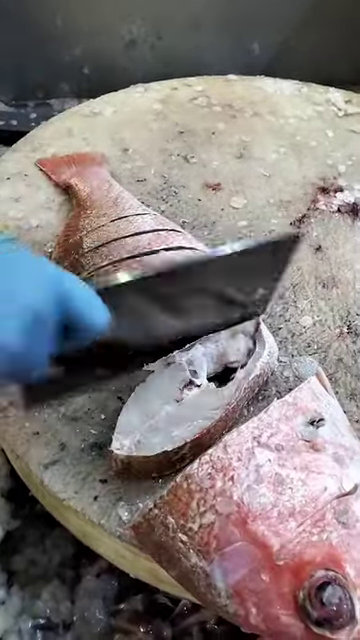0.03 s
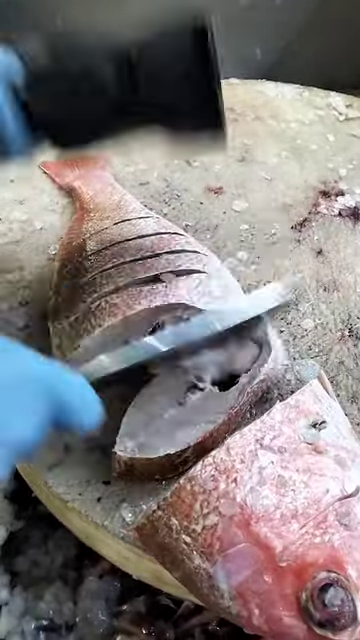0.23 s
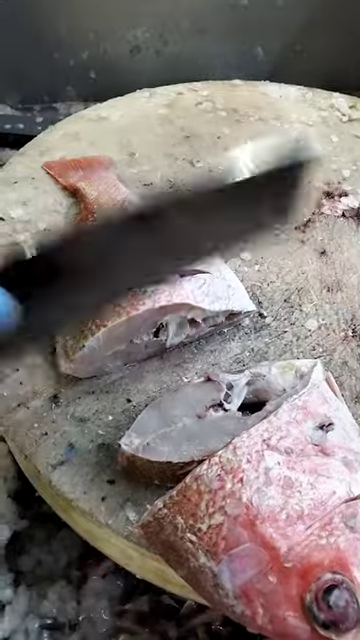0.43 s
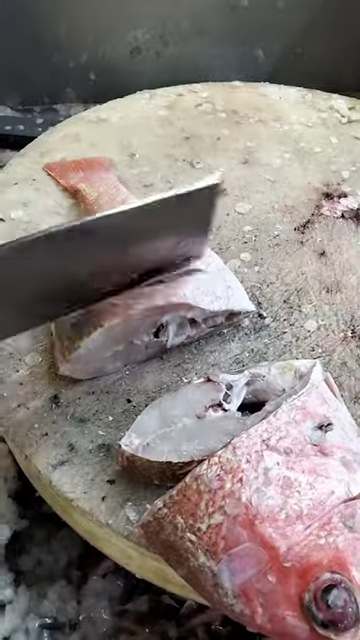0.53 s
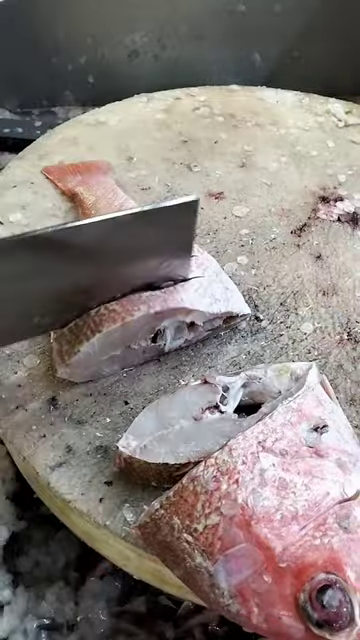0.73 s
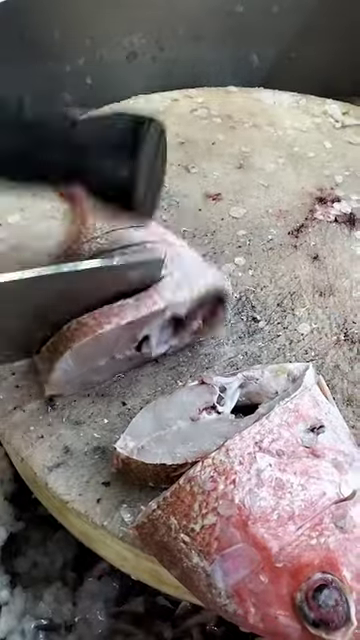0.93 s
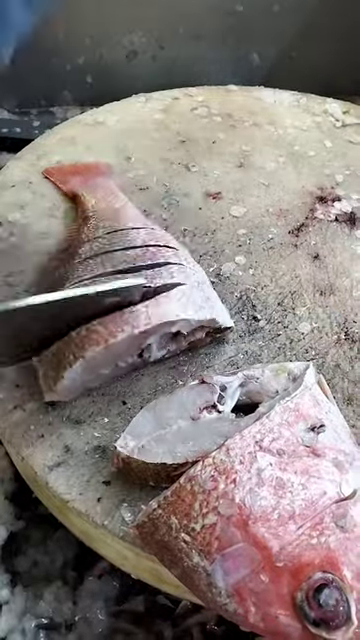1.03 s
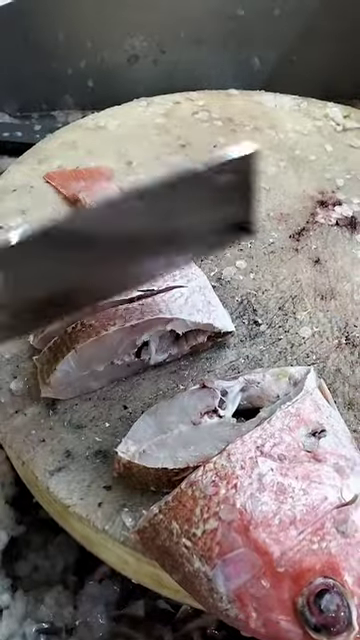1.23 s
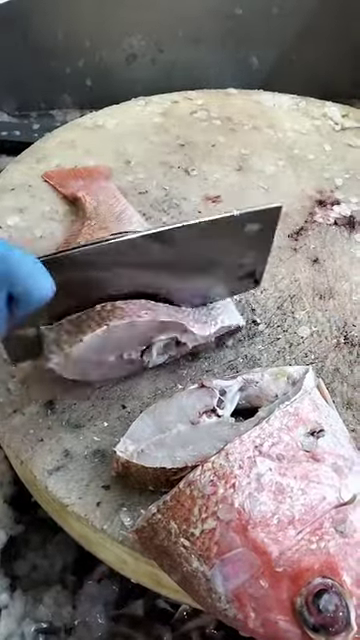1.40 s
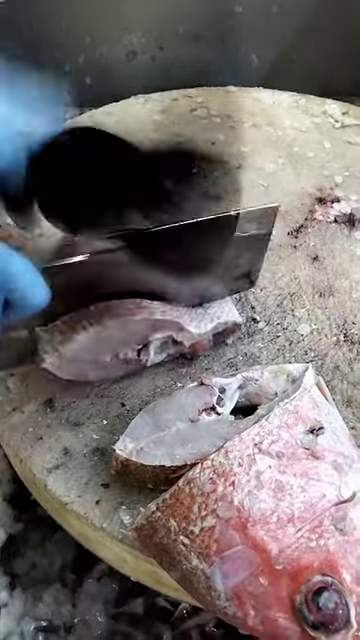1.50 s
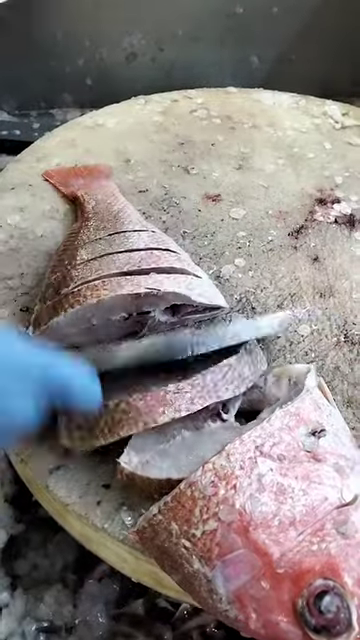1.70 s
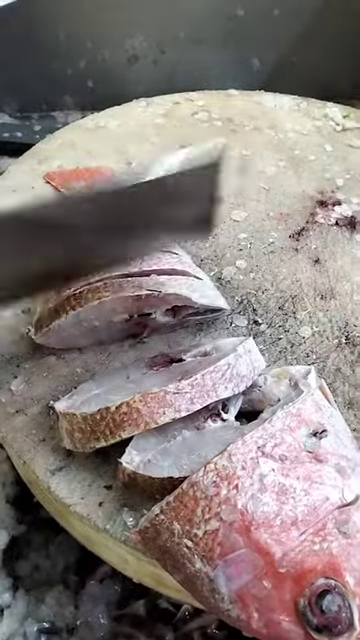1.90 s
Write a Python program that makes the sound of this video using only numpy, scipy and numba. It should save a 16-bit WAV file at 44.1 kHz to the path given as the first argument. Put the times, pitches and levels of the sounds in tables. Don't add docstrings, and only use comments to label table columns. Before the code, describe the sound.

Cleaver blows crack through fish onto a wooden chopping block, with faint wet ticks between them

```python
import sys
import numpy as np
from scipy import signal
from scipy.io import wavfile
from scipy.ndimage import uniform_filter1d, minimum_filter1d
from numba import njit

SR = 44100
rng = np.random.default_rng(int(sys.argv[2]) if len(sys.argv) > 2 else 0)


def generate_wav(sig):
    pcm = np.round(np.clip(np.atleast_2d(sig).T, -1, 1) * 32767).astype(np.int16)
    wavfile.write(sys.argv[1], SR, pcm)


def boost_factor(decibels):
    exponent = np.asarray(decibels, float) / 20
    return 10 ** exponent


N = 85995

# [t/s, level/dB, crack length/s, lead-in through flesh/s, damping on landing/dB]
BLOWS = [
    (-.17, -2.5, .004, .003, -0.5),
    (0.2082, 4.5, 0.0061, 0.0038, -2.5),
    (0.9088, 4, 0.0039, 0.0026, -5.5),
    (1.5349, 3.5, 0.0012, 0.0054, -7),
]
KIND = [2, 0, 1, 2]

# [f/Hz, time to fall 60 dB/s, rise/s, dull level/dB, sharp level/dB, ringing level/dB]
STAND_MODES = [(44.4, 0.18, 0.0051, -40, -31, -37), (72.63, 0.71, 0.037, -25, -16.5, -13),
               (80.9, 1, 0.11, -44, -23, -33), (92.07, 0.44, 0.01, -6, -17, -4),
               (130.9, 0.43, 0.013, -18, -10, -29), (136.7, .36, 0.0077, -4.5, -23.5, -10),
               (187.3, 0.14, 0.0032, -3, -14, -8), (222.3, 0.45, 0.013, -11.5, -13.5, -11.5),
               (313.3, 0.31, 0.053, -11, -6.5, -5.5), (395.5, 0.18, 0.0071, -31.5, -16, -10),
               (432.5, 0.32, 0.015, -22, -18, -23), (572.4, 0.37, 0.017, -22.5, -22, -14.5)]
# [f/Hz, time to fall 60 dB/s, rise/s, dull level/dB, sharp level/dB, ringing level/dB]
BLADE_MODES = [(643, 0.24, 0.0015, -22, -20, -32), (706.2, 0.12, 0.0051, -23, -5.5, -7),
               (705, 0.21, 0.0034, -40, -42, -11), (909, 0.061, 0.0018, -45, -17.5, -15),
               (988, 0.086, 0.002, -40, -24, -5), (1060, 0.59, 0.005, -42, -37, -26.5),
               (1143, 0.41, 0.0036, -32, -30, -22.5), (1243, 0.046, 0.0023, -24, -7.5, -23),
               (1482, 0.027, 0.0014, -21, -7.5, -5.5), (1695, 0.32, 0.00022, -48, -45, -24.5),
               (2300, 0.047, 0.00011, -27, -16.5, -26), (4150, 0.077, 0.0027, -34, -37, -45)]
# [f/Hz, s, s, dB, dB, dB]
CHEEK_MODES = [(627, 0.56, 0.0077, -45, -38, -28), (1037, 0.16, 0.0028, -44, -33, -16.5),
               (1048, 0.42, 0.0045, -33, -30, -16.5), (1105, 0.39, 0.0044, -36, -45, -21),
               (1130, 0.19, 0.0028, -52, -40, -13.5), (1225, 0.18, 0.0023, -27, -17, -20),
               (1306, 0.22, .002, -33, -29, -28), (1667, 0.29, 0.0028, -40, -31, -25),
               (1721, 0.31, 0.0035, -38, -30, -27), (1770, 0.21, 0.006, -49, -29, -25),
               (2006, 0.067, 0.00083, -32, -24, -34), (2440, 0.097, 0.0016, -45, -43, -20.5),
               (3200, 0.16, .001, -39, -43, -42), (4022, 0.17, 0.0032, -46, -42, -28)]
STAND_ROUGH, BLADE_ROUGH, CHEEK_ROUGH = 0.22, 0.25, 0.4
ROUGH_HZ, WAVER_GROWS_S = 25.19, 0.02
STAND_LAG_S = [0.0056, 0.001, 0.0053]
PRESS_DB = [-17, -22, -17]
PRESS_S = 0.0049
ROCKING_HZ = (120, 150)

SETTLE_S, SETTLE_EDGE_S = 0.086, 0.01
SETTLE_TOP_HZ, DEEP_SETTLE, HIGH_SETTLE = 900, 0.82, 0.25

# [f/Hz, time to fall 60 dB/s, rise/s, dull level/dB, sharp level/dB, ringing level/dB]
KNOCK_MODES = [(403.4, 0.073, 0.0034, -3, -24, -4.5), (683, 0.069, 0.0059, -7, -9, -6.5),
               (1029, 0.052, 0.0015, -6, -14, -6), (1680, 0.068, 0.00017, -23, -21.5, -24),
               (2913, 0.014, 0.00032, -17, -8, -10.5)]

SHOVE_DB = [-40, -2, -20]
SHOVE_S = 0.0026

# [f/Hz, level per Hz/dB]
CRACK_COLOURS = [
    [(180, -40), (300, 5.5), (1150, 2), (1510, -44), (4020, -9.5), (7080, -54), (14200, -33), (16000, -33)],
    [(180, -3), (300, -7), (1530, -20), (3580, -20), (4300, -6.5), (7440, -22), (11700, -16.5),
     (16000, -26)],
    [(180, -35), (300, -14), (1170, -12), (2140, -30.5), (3890, -13), (7570, -38.5), (12300, -31.5),
     (16000, -40)],
]
CRACK_DB = [-9, -4, -6]
LEAD_DB = [-18, -18, -11]
CRACK_RISE, CRACK_FALL = 0.35, 3.5

# [f/Hz, level per Hz/dB]
TAIL_COLOURS = [
    [(94, -55), (160, -2.5), (436, -11.5), (508, -24), (653, -12), (1920, -29.5), (11800, -53.5),
     (16000, -74)],
    [(94, -12.5), (160, 1), (270, -6), (480, -12), (719, -7), (1520, -17), (1680, -19.5), (16000, -49)],
    [(100, -22), (170, -4.5), (480, -16), (1080, -10.5), (1400, -18), (2150, -25.5), (4000, -31),
     (16000, -58)],
]
TAIL_DB = [-16.5, -10, -9.5]
# [f/Hz, time to fall 60 dB/s]
STALL_T60 = [(40, 0.84), (150, 0.55), (500, 0.52), (1500, 0.2), (4000, 0.21), (15000, 0.18)]
LATE_DB, LATE_T60_S = -24, 1.0

# [t/s, length/s, level/dB, tilt/dB per octave]
DRAGS = [(0.214, 0.022, -49, 4.5), (0.246, 0.037, -41.5, -1), (0.289, 0.031, -39.5, -2.5),
         (0.324, 0.024, -43.5, -2.5), (0.346, 0.052, -51.5, -8.5), (0.413, 0.073, -55.5, -8.5),
         (0.63, 0.034, -64.5, 5), (.665, 0.022, -62, 3), (0.685, 0.055, -54, 4), (0.749, 0.044, -53, 2),
         (0.787, .005, -58, 2), (0.792, 0.015, -57, 2), (0.814, 0.056, -53, -0.5), (1.17, 0.37, -62.5, 2.5),
         (1.222, .22, -59.5, -9.5), (1.351, 0.023, -55, -8.5), (1.012, 0.061, -50.5, -6)]
# [f/Hz, level per Hz/dB]
DRAG_COLOUR = [(180, -37), (350, -7.5), (1500, 0), (2000, -2.5), (4300, -1.5), (6600, -10.5),
               (14600, -15.5), (16000, -22)]
DRAG_EDGE_S, DRAG_FLICKER_DB = 0.022, 1.05
# [t/s, length/s, f/Hz, width/Hz, level/dB]
SQUEALS = [(0.7, 0.071, 4420, 350, -57), (.685, 0.017, 7500, 500, -55), (.695, .02, 8400, 500, -65),
           (0.29, .03, 13000, 460, -59), (0.3, .03, 13800, 500, -63), (0.28, .03, 6400, 500, -56)]

# [t/s, peak level/dB, centre f/Hz]
TICKS = [(.1451, -47, 4060), (.367, -45, 6000), (.474, -44, 3930), (.5155, -40, 3900), (.5608, -48, 5030),
         (.7876, -38, 3700), (.7878, -43, 11800), (.7878, -44, 15000), (.804, -49, 5500),
         (.8268, -33, 3050), (.8272, -42, 6000), (.8295, -45, 13500), (.834, -42, 3020), (.8375, -43, 2000),
         (.864, -48, 6000), (1.274, -43, 5070), (1.304, -48.5, 8960), (1.356, -47, 6000),
         (1.4735, -49, 9000)]
TICK_S, TICK_AIR_DB = 0.002, -14

# [t/s, length/s, f/Hz, level/dB]
WHINES = [(0.033, 0.19, 796, -51), (0.386, 0.11, 862, -52.5), (0.626, 0.23, 393, -53.5),
          (0.722, 0.12, 1179, -61), (1.205, 0.86, 1572, -61), (1.317, 0.2, 770, -56),
          (1.832, .2, 393, -48.5)]
# [f/Hz, level per Hz/dB]
FLOOR_COLOUR = [(45, -15), (72, 4.5), (400, -16), (1650, -25.5), (2000, -30.5), (4300, -31.5), (6300, -43),
                (16000, -44.5)]
FLOOR_DB, FLICKER_DB, TREBLE_SWELL_DB = -41.5, 3.5, 2.2

# [f/Hz, width/Hz, boost as a factor]
PORT = [(4180, 800, .4), (8460, 800, .35), (11900, 1300, .4), (14600, 1400, .5)]
CEILING, RELEASE_S, TOP_HZ = 0.98, 0.045, 15900

BANDS_HZ = 28 * 2 ** np.arange(0, 9.3, 1 / 3)


def band(x, hz, width):
    edges = np.clip([hz - width / 2, hz + width / 2], 10, 0.45 * SR)
    return signal.sosfilt(signal.butter(2, edges, "bandpass", fs=SR, output="sos"), x)


def unit(x):
    return x / np.sqrt(np.mean(x ** 2))


def band_noises():
    return np.array([band(rng.standard_normal(N), hz, 0.24 * hz) for hz in BANDS_HZ])


def read(table, hz):
    table = np.array(table)
    return np.interp(np.log(hz), np.log(table[:, 0]), table[:, 1])


def weights(colour):
    gain = boost_factor(read(colour, BANDS_HZ))
    power = np.sum(gain ** 2 * 0.28 * BANDS_HZ) / (SR / 2)
    return gain / np.sqrt(power)


def walk(rate):
    hold = int(SR / rate)
    levels = np.repeat(rng.standard_normal(N // hold + 1), hold)
    return 1.3 * uniform_filter1d(uniform_filter1d(levels, hold), hold)[:N]


def fade(age, rise, t60):
    age = np.maximum(age, 0)
    growth = 1 - np.exp(-age / np.maximum(rise, 1e-4))
    return growth * np.exp(-np.log(1000) * age / np.maximum(t60, 1e-3))


def settle(age, db):
    return boost_factor(db * np.clip((age - SETTLE_S) / SETTLE_EDGE_S, 0, 1))


def rings(t):
    out = np.zeros(N)
    groups = ((STAND_MODES, STAND_ROUGH, 0.7), (BLADE_MODES, BLADE_ROUGH, 0.7), (CHEEK_MODES, CHEEK_ROUGH, 0))
    for modes, rough, speedup in groups:
        for hz, t60, rise, *kind_db in modes:
            waver = rough * walk(ROUGH_HZ * (hz / 200) ** speedup)
            sign = -1 if ROCKING_HZ[0] < hz < ROCKING_HZ[1] else 1
            damping = DEEP_SETTLE if hz < 110 else 1 if hz < SETTLE_TOP_HZ else HIGH_SETTLE
            for (at, db, _, _, settle_db), kind in zip(BLOWS, KIND):
                span = slice(max(int((at - 0.03) * SR), 0), int((at + 0.8) * SR))
                age = t[span] - at - STAND_LAG_S[kind] * (hz < 150)
                shape = fade(age, rise, t60) * settle(age, settle_db * damping)
                if 900 < hz < 1100:
                    shape += (age < 0) * boost_factor(PRESS_DB[kind]) * np.exp(np.minimum(age, 0) / PRESS_S)
                shape *= 1 + waver[span] * np.clip(age / WAVER_GROWS_S, 0, 1)
                out[span] += sign * boost_factor(db + kind_db[kind]) * shape * np.sin(2 * np.pi * hz * age)
    return out


def knocks(t):
    out = np.zeros(N)
    for hz, t60, rise, *kind_db in KNOCK_MODES:
        for (at, db, *_), kind in zip(BLOWS, KIND):
            age = t - at
            out += boost_factor(db + kind_db[kind]) * fade(age, rise, t60) * np.sin(2 * np.pi * hz * age)
    return out


def shoves(t):
    out = np.zeros(N)
    for (at, db, *_), kind in zip(BLOWS, KIND):
        out += boost_factor(db + SHOVE_DB[kind]) * np.sin(np.pi * np.clip((t - at) / SHOVE_S, 0, 1))
    return out


def cracks(t):
    noise, out = band_noises(), np.zeros(N)
    grit = boost_factor(2.5 * walk(2500))
    for (at, db, length, lead, _), kind in zip(BLOWS, KIND):
        age = t - at
        burst = fade(age, CRACK_RISE * length, CRACK_FALL * length)
        cut = (age < 0) * np.sqrt(np.maximum(1 + age / lead, 0))
        shape = burst + boost_factor(LEAD_DB[kind]) * cut
        out += boost_factor(db + CRACK_DB[kind]) * shape * grit * (weights(CRACK_COLOURS[kind]) @ noise)
    return out


def stall(t):
    noise, out = band_noises(), np.zeros(N)
    t60 = read(STALL_T60, BANDS_HZ)[:, None]
    rise = 0.5 / BANDS_HZ[:, None] + 0.00052
    damping = np.where(BANDS_HZ < SETTLE_TOP_HZ, 1, HIGH_SETTLE)[:, None]
    for (at, db, _, _, settle_db), kind in zip(BLOWS, KIND):
        span = slice(max(int(at * SR), 0), int((at + 1) * SR))
        age = t[span] - at
        early = fade(age, rise, t60) * settle(age, settle_db * damping)
        late = boost_factor(LATE_DB) * fade(age, 0.082, LATE_T60_S)
        answer = weights(TAIL_COLOURS[kind]) @ ((early + late) * noise[:, span])
        out[span] += boost_factor(db + TAIL_DB[kind]) * answer
    return out


def stroke(t, at, length):
    start = np.clip((t - at) / DRAG_EDGE_S, 0, 1)
    return start * np.clip((at + length - t) / DRAG_EDGE_S + 1, 0, 1)


def drags(t):
    noise, out = band_noises(), np.zeros(N)
    for at, length, db, tilt_db in DRAGS:
        tilt = boost_factor(tilt_db * np.log2(BANDS_HZ / 2500))
        out += boost_factor(db) * stroke(t, at, length) * ((weights(DRAG_COLOUR) * tilt) @ noise)
    for at, length, hz, width, db in SQUEALS:
        squeal = unit(band(rng.standard_normal(N), hz, width))
        out += boost_factor(db) * stroke(t, at, length) * squeal
    return out * boost_factor(DRAG_FLICKER_DB * walk(80) + 1.2 * walk(400) + 1.5 * walk(1500))


def ticks():
    out, age = np.zeros(N), np.arange(600) / SR
    for at, db, hz in TICKS:
        puff = rng.standard_normal(600) * np.exp(-age / TICK_S)
        snap = band(puff, hz, 0.5 * hz)
        snap += boost_factor(-5) * band(puff, 1240, 1400)
        snap += boost_factor(-10) * band(puff, 6100, 3500)
        snap += boost_factor(TICK_AIR_DB) * band(puff, 13500, 6000)
        start = int(at * SR)
        out[start:start + 600] += boost_factor(db) * snap / np.abs(snap).max()
    return out


def motor_whine(t):
    out = np.zeros(N)
    for at, length, hz, db in WHINES:
        edges = np.clip(np.minimum(t - at, at + length - t) / 0.0093, 0, 1)
        level = boost_factor(db + 3 + 0.73 * walk(40))
        out += level * edges * np.sin(2 * np.pi * hz * t + 0.51 * walk(25.2))
    return out


def machine_floor():
    swell, rustle = walk(2.5), walk(24.83)
    flicker = []
    for hz in BANDS_HZ:
        treble = TREBLE_SWELL_DB * rustle * (hz > 5000)
        flicker.append(boost_factor(FLICKER_DB * walk(15.0) + 0.16 * swell + treble))
    return boost_factor(FLOOR_DB) * (weights(FLOOR_COLOUR) @ (np.array(flicker) * band_noises()))


def scene():
    t = np.arange(N) / SR
    blows = rings(t) + knocks(t) + shoves(t) + cracks(t) + stall(t)
    between = drags(t) + ticks()
    return (blows + between + motor_whine(t) + machine_floor())[None]


@njit
def limit(peak, ceiling, release):
    gain, held = np.empty(len(peak)), 0.
    for i in range(len(peak)):
        held = max(peak[i], held * release)
        gain[i] = min(1., ceiling / (held + 1e-9))
    return gain


def band_limit(x):
    return signal.sosfilt(signal.butter(12, 16450, fs=SR, output="sos"), x)


def record(dry):
    dry = dry + sum(boost * band(dry, hz, width) for hz, width, boost in PORT)
    peak = -minimum_filter1d(-np.abs(dry[0]), size=89)
    gain = limit(peak, CEILING, np.exp(-1 / (RELEASE_S * SR)))
    limited = dry * uniform_filter1d(gain, size=45)
    top_cut = signal.ellip(8, 0.2, 70, TOP_HZ, fs=SR, output="sos")
    mix = signal.sosfilt(top_cut, limited)
    return band_limit(mix)


dry = scene()
out = record(dry)
generate_wav(out)
```